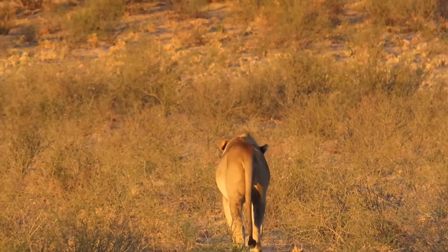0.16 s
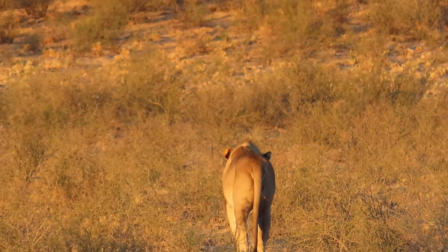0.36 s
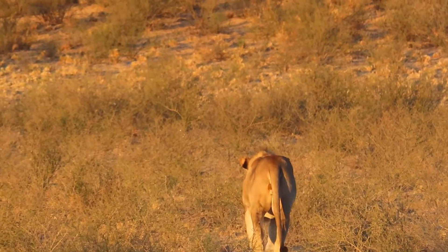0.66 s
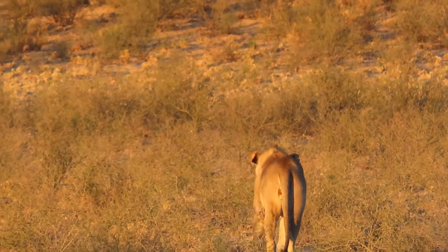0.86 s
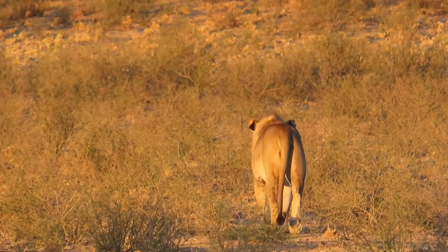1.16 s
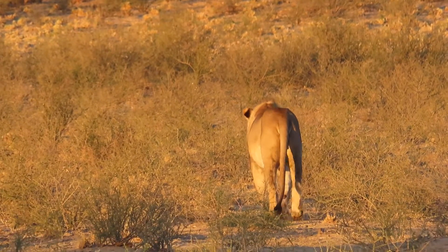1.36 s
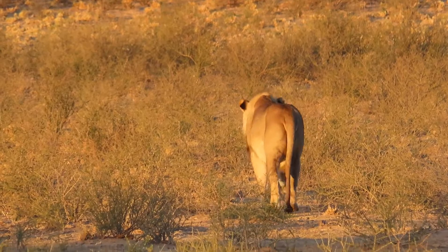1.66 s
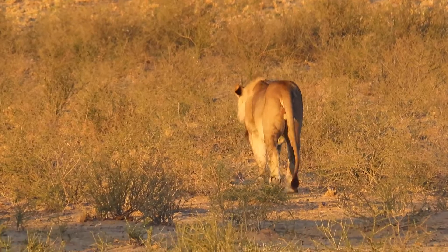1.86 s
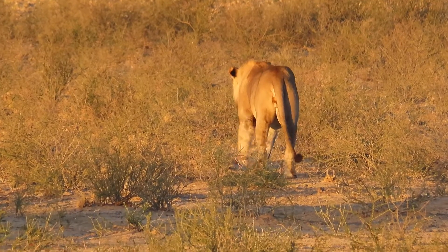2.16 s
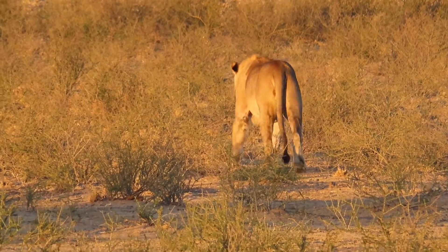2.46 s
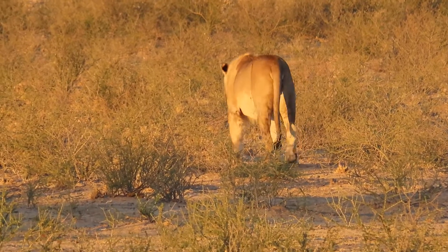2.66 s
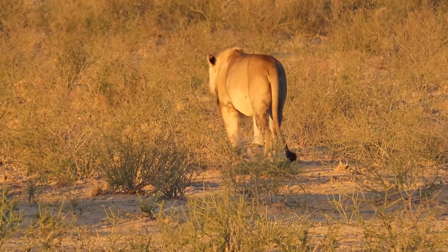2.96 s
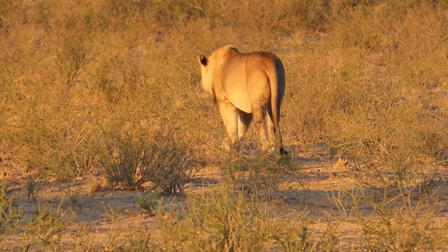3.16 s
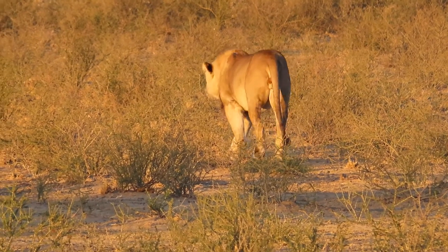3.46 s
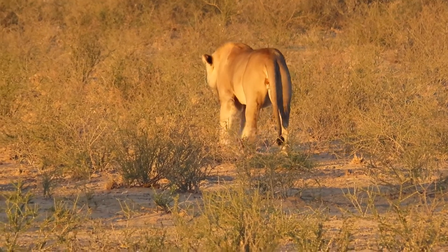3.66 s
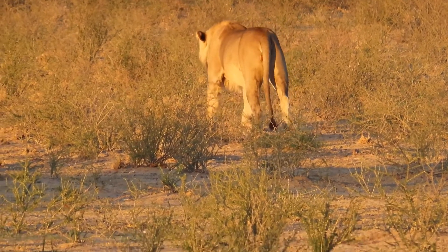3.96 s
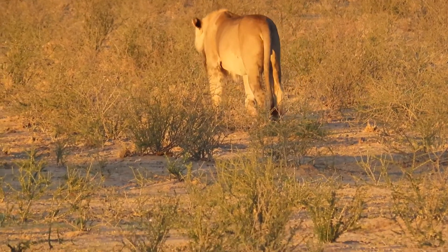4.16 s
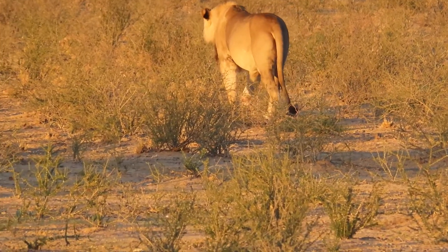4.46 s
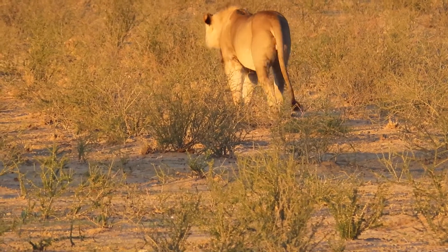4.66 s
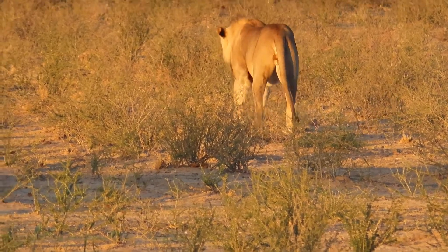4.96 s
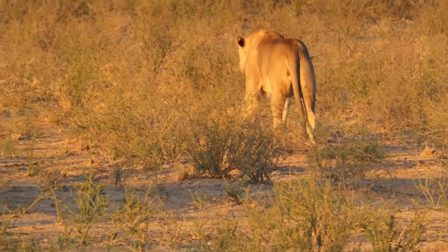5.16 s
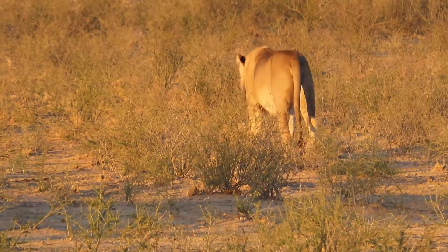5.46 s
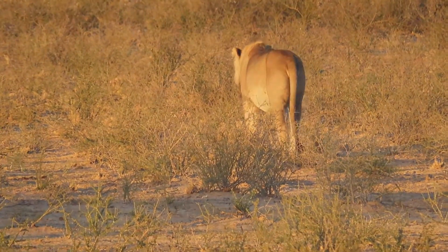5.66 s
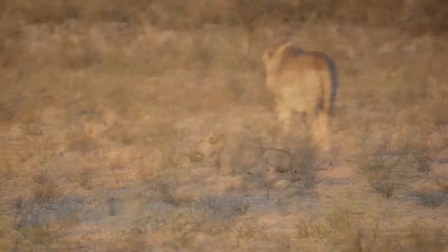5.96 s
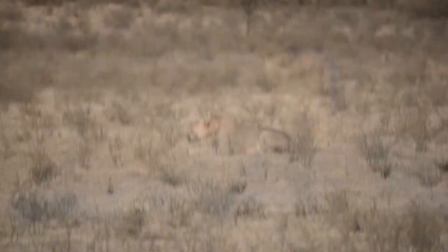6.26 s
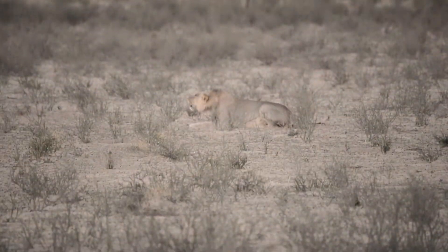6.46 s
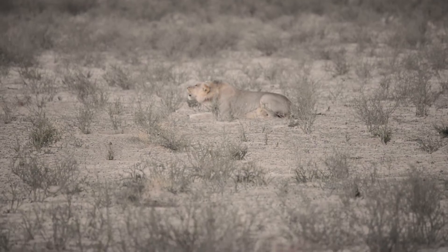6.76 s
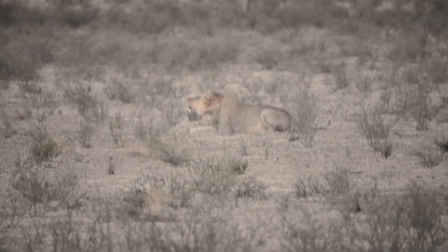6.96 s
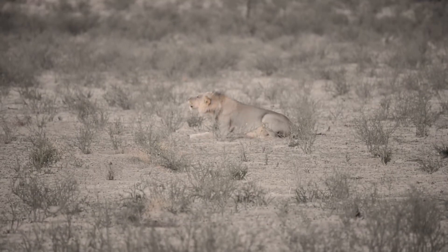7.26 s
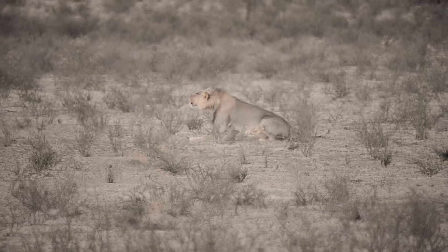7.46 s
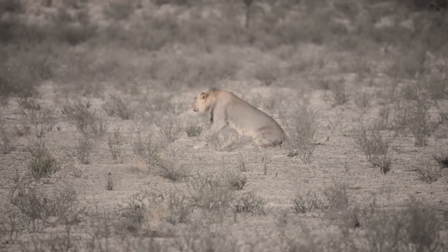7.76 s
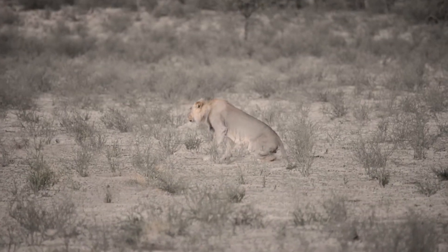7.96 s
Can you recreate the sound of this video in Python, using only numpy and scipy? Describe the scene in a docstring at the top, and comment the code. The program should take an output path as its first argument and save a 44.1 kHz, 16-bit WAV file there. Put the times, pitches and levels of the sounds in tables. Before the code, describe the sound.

Open dry scrub with very quiet, wide air and faint hiss. At 0.1 s a close, central lion starts a long, deep, nearly pure chest moan, strong and low, softening in the middle, then pushing and breaking into a pulsing raspy growl by 1 s and sagging out near 1.3. Shorter, grunting roars follow at 2.1-2.7, 3.3-3.65 (the shortest, a bit weaker), 4.4-5.0 and 5.9-6.4, each breaking into growl, with quiet gaps between. From about 6.3 the air shifts to a narrower, sandy background with a barely audible cricket tone. At 6.45 a higher lion moan arches upward; a second moan joins at 6.7, beating against it. After 7.3 both turn hoarse and growly, fading by 7.9, while dry stalks snap, scrape and rustle from 7.2 to 7.9, after one isolated crack at 6.85. A tiny falling chirp at 7.86 and a short hoarse bird squawk at 7.95-8.1 finish. Echo is very faint.

```python
"""Lions in dry scrub

A lion roars five times: a chest moan that breaks into a growl, shorter after the first, with rasp on top. Then
a resting lion moans and a second voice crosses it; both are buzzing folds through fixed resonances. Stalks
crackle in bursts of coloured noise as it gets up; a two-voiced bird squawks after a falling chirp. Scrub air
gives way to sand air with a cricket's tone; open ground returns a faint, late echo."""
import sys
import numpy as np
from scipy import signal
from scipy.fft import next_fast_len
from scipy.io import wavfile
from scipy.ndimage import uniform_filter1d

SR = 44100
rng = np.random.default_rng(int(sys.argv[2]) if len(sys.argv) > 2 else 0)


def log_audio(samples):
    """Write samples as a 16-bit WAV file to the path given in sys.argv[1]."""
    # one column per channel
    frames = np.atleast_2d(samples).T
    # limit to full scale, then quantise
    limited = np.clip(frames, -1, 1)
    pcm = np.round(limited * 32767).astype(np.int16)
    wavfile.write(sys.argv[1], SR, pcm)


N = 357651
T = np.arange(N) / SR

# vocal tract resonances of both moans: (centre [Hz], width [Hz], level [dB])
MOAN_THROAT = [(290, 125, -0.5), (446, 32, 5.5), (638, 157, -5), (686, 11, -20), (1041, 67, -11),
               (1260, 98, -14.5), (1970, 340, -28.5), (2900, 320, -27.5)]
# both moaning voices turn hoarse from this moment, over this time
HOARSE_FROM_S, HOARSE_S = 7.33, 0.24


def amp(db):
    """Decibels to gain."""
    return 10 ** (np.asarray(db) / 20)


def ramp(x):
    """Holds a value between 0 and 1."""
    return np.clip(x, 0, 1)


def bump(middle, half_length):
    """A smooth swell of height 1 around a moment."""
    return np.exp(-((T - middle) / half_length) ** 2)


def evened(x):
    """Scales to rms 1."""
    return x / np.sqrt(np.mean(x ** 2) + 1e-20)


def steadied(x, size=1500):
    """Holds the running rms near 1; size is in samples."""
    power = uniform_filter1d(uniform_filter1d(x ** 2, size), size)
    return x / np.sqrt(abs(power) + 1e-12)


def curves(rows):
    """Each column of a table as a curve over the whole time."""
    s, *columns = np.transpose(rows)
    return [np.interp(T, s, c) for c in columns]


def during(rows):
    """A soft gate, open from the first row to the last."""
    return ramp(np.minimum(T - rows[0][0], rows[-1][0] - T) / 0.0082)


def phase(hz):
    """Running phase in radians of a pitch curve."""
    return 2 * np.pi * np.cumsum(hz) / SR


def read(points, hz):
    """Gain of a spectrum at the given frequencies, read along a logarithmic axis."""
    f, db = np.transpose(points)
    return amp(np.interp(np.log(hz + 1), np.log(f), db))


def colour(x, points):
    """Causal filter with the given spectrum, falling away beyond its ends."""
    size = next_fast_len(len(x) + 8192)
    hz = abs(np.fft.fftfreq(size, 1 / SR))
    top_fall = 1 + (hz / points[-1][0] / 1.3) ** 6
    bottom_fall = np.minimum(hz / points[0][0], 1) ** 2
    gain = read(points, hz) / top_fall * bottom_fall
    # minimum phase: no sound ahead of its cause
    response = np.exp(signal.hilbert(np.log(gain + 1e-5)).conj())
    return np.fft.ifft(np.fft.fft(x, size) * response).real[:len(x)]


def noise():
    """White noise."""
    return rng.standard_normal(N)


def wander(hz):
    """Smooth chance of rms 1, up to the given rate."""
    coarse = T[::16]
    lowpass = signal.butter(2, hz, fs=1 / coarse[1], output="sos")
    slow = signal.sosfilt(lowpass, rng.standard_normal(len(coarse)))
    return np.interp(T, coarse, evened(slow))


def formants(modes, skirt=1.19):
    """The spectrum of a set of resonances with deep valleys between, as (Hz, dB) points."""
    hz = np.geomspace(modes[0][0] / 2, modes[-1][0] * 2, 300)
    gain = sum(amp(db) / (1 + ((hz - centre) / (0.49 * width)) ** 2) ** skirt
               for centre, width, db in modes)
    return np.column_stack([hz, 20 * np.log10(gain)])


def resonate(x, hz, width):
    """A resonance that follows the curve hz: shifted to zero, smoothed, shifted back."""
    turn = np.exp(1j * phase(hz))
    r = np.exp(-np.pi * width / SR)
    return 2 * (turn * signal.lfilter([1 - r], [1, -r], x / turn)).real


def ring(source, hz, db, width):
    """A steep resonance, fixed or moving: two passes, steadied, then set to a level."""
    hz = hz * np.ones(N)
    twice = resonate(resonate(source, hz, width), hz, width)
    return amp(db) * steadied(twice)


def voiced(buzz, modes):
    """The buzz through a vocal tract, at rms near 1."""
    return steadied(colour(buzz, formants(modes)))


def wavering(buzz, modes, waver_db=6.5, waver_hz=16):
    """The buzz through a vocal tract whose neighbouring resonances swell and fade apart."""
    parts = (modes[::2], modes[1::2])
    return steadied(sum(colour(buzz, formants(part)) * amp(waver_db * wander(waver_hz)) for part in parts))


def folds(pitch, rough, jitter=0.06, shimmer=0.55, flap_depth=0.46, growl_share=0.46):
    """Heavy vocal folds: returns the chest tone and the buzz that drives the throat."""
    # the chest in a growl: (frequency [Hz], level [dB])
    growl_spectrum = [(25, -18), (45, -16.5), (62, -5.5), (95, -7), (130, 9), (170, -3), (230, -17),
                      (400, -41)]
    turns = np.cumsum(pitch * (1 + jitter * rough ** 2 * wander(45))) / SR
    # when the voice breaks, loose tissue flaps slowly and lets the air out in bursts
    flap_hz = 36 * (1 + 0.32 * wander(30))
    flaps = np.cumsum(flap_hz) / SR
    bursts = 1 + 2 * flap_depth * rough ** 2 * np.exp(-(flaps % 1) / 0.1)
    flutter = amp(4.2 * rough ** 2 * wander(85)) * bursts
    puffs = noise() * (0.5 + np.exp(-(turns % 1) / 0.3))
    # each closure is a pulse; in a rough voice they differ in timing and strength
    slip = 0.16 * rough ** 2 * wander(70)
    closures = np.diff(np.floor(turns + slip), prepend=0) * (1 + rough * wander(130))
    airy = 0.7 * rough
    buzz = ((1 - airy) * evened(closures) + airy * evened(puffs)) * flutter
    # past a threshold the chest tone itself breaks up
    broken = ramp((rough - 0.46) / 0.4)
    share = ramp(growl_share * broken)
    tone = np.sqrt(2) * np.sin(2 * np.pi * turns) * (1 + shimmer * broken * wander(58))
    growl = steadied(colour(puffs * flutter, growl_spectrum))
    chest = np.sqrt(1 - share) * tone + np.sqrt(share) * growl
    return steadied(chest, size=900), buzz


def air(spectrum, side=0.93):
    """A distant wash of coloured noise that drifts a little; its bass is nearly alike in both ears."""
    mid, apart = (evened(colour(noise(), spectrum)) for _ in range(2))
    apart = colour(apart, [(100, -16.5), (400, 2.0), (1000, -5.0), (5000, -1.0), (9000, -6), (16000, -12)])
    drift_db = 1.0 * wander(4.9)
    return (mid + side * np.array([apart, -apart])) * amp(drift_db)


def cricket():
    """A cricket's high tone, quivering in strength and slightly in pitch."""
    shimmer = 1 + 0.35 * wander(60)
    return amp(-58) * shimmer * np.sin(phase(4720 + 10 * wander(100)))


def ambience():
    """Air over the scrub gives way to air over the sand, where a cricket sings."""
    # still air over the scrub: (frequency [Hz], density [dB per Hz])
    scrub_air = [(25, -20), (42, 4), (62, 5), (93, -10), (135, 5.5), (200, -9.5), (300, -10), (520, -17.5),
                 (810, -10.5), (1040, -13), (1180, -23), (2000, -29), (3500, -43)]
    # faint hiss over the scrub: (frequency [Hz], density [dB per Hz])
    scrub_hiss = [(1200, -1.5), (2500, -1), (4500, -4.5), (8500, -13), (11500, -19.5), (15000, -31)]
    # still air over the sand: (frequency [Hz], density [dB per Hz])
    sand_air = [(50, -24), (140, 19), (300, -3.5), (1000, -5), (1600, -10.5), (3600, -16.5), (4600, -12),
                (5600, -15.5), (8000, -24), (15000, -27.5)]
    # the hiss dips briefly: (middle [s], half length [s], change [dB])
    hiss_dip = (1.0, .55, -7.5)
    dip_s, dip_half, dip_db = hiss_dip
    hiss_db = -60.5 + dip_db * bump(dip_s, dip_half)
    scrub = amp(-46) * air(scrub_air) + amp(hiss_db) * air(scrub_hiss)
    sand = amp(-44) * air(sand_air, side=0.023) + cricket()
    scrub_end_s, scrub_fade_s, scrub_left_db = 6.88, 0.62, -38.5
    sand_start_s, sand_fade_s = 6.28, 0.41
    scrub_gain = np.maximum(ramp((scrub_end_s - T) / scrub_fade_s), amp(scrub_left_db))
    return scrub * scrub_gain + sand * ramp((T - sand_start_s) / sand_fade_s)


def open_ground_echo(x, t60_s=1.0, build_s=0.7, echo_db=-41):
    """Slopes and bushes scatter the low notes back, late and faint: noise taps that build, then decay."""
    t = T[:2 * SR]
    taps = rng.standard_normal(len(t)) * amp(-60 * t / t60_s) * np.minimum(t / build_s, 1)
    scattered = signal.fftconvolve(x, taps / np.linalg.norm(taps))[:N]
    return amp(echo_db) * colour(scattered, [(50, 4.5), (130, 16.5), (500, 9), (2500, -10.5)])


def chirp():
    """A short falling whistle: one sine along a pitch curve."""
    # (time [s], pitch [Hz], level [dB])
    chirp_rows = [(7.855, 3760, -50), (7.864, 3600, -54), (7.88, 3300, -53), (7.905, 3060, -60)]
    hz, level = curves(chirp_rows)
    return amp(level) * np.sin(phase(hz)) * during(chirp_rows)


def squawk():
    """The two sides of a syrinx sing at once, unsteadily, and mix into sum tones in a hoarse haze."""
    # (time [s], upper voice [Hz], lower voice [Hz], upper level [dB], lower level [dB])
    squawk_rows = [(7.95, 1130, 870, -62, -76), (7.98, 1313, 935, -47, -76), (8.005, 1415, 986, -45.5, -55),
                   (8.025, 1655, 1180, -40, -38.5), (8.05, 1676, 1243, -39, -48),
                   (8.07, 1554, 1210, -46, -39.5), (8.085, 1460, 1120, -45, -43),
                   (8.11, 1290, 1030, -41, -55)]
    upper_hz, lower_hz, upper_db, lower_db = curves(squawk_rows)
    upper, lower = (phase(hz * (1 + 0.014 * wander(300))) for hz in (upper_hz, lower_hz))
    both_db = (upper_db + lower_db) / 2
    own = sum(amp(db) * (0.44 * np.sin(p) + np.sin(2 * p) + 0.33 * np.sin(3 * p))
              for p, db in ((upper, upper_db), (lower, lower_db)))
    sum_tones = np.sin(upper + lower) + 0.3 * np.sin(upper + 2 * lower)
    mixed = amp(both_db + 3 * wander(60)) * sum_tones
    haze = ring(noise(), upper_hz + lower_hz, both_db - 10, width=1100)
    return (own + mixed + haze) * (T > squawk_rows[0][0])


def snap(s, db, spectrum, decay, rise=0.0019):
    """A stalk snaps: one sharp burst of coloured noise with a weak tail."""
    t = np.arange(-1024, 2048) / SR
    # the burst peaks 2 ms after the given time
    burst_shape = np.exp(np.minimum((t - 0.002) / rise, (0.002 - t) / decay))
    tail = 0.12 * np.exp(-abs(t) / 0.007) * (t > 0)
    burst = colour(rng.standard_normal(len(t)) * (burst_shape + tail), spectrum)
    burst /= np.sqrt(uniform_filter1d(burst ** 2, 128).max())
    return amp(db) * np.pad(burst, (round((s + t[0]) * SR), N))[:N]


def dry_grass():
    """Stalks scrape past each other and snap, over a fine crackle of many small ones."""
    # stalks snapping: (time [s], base level [dB], woody knock against the base [dB])
    snap_rows = [(6.8449, -27, -19), (7.215, -44, 4), (7.308, -41, 2.5), (7.3166, -34.5, -3),
                 (7.3615, -26.5, -1), (7.391, -33, -2), (7.402, -34.5, 4), (7.438, -36, -3),
                 (7.591, -31.5, 7), (7.635, -34.5, 3), (7.7202, -27.5, 0.5), (7.7581, -30.5, -4),
                 (7.768, -44, 6), (7.8023, -22, 0.5), (7.903, -46, -16)]
    # spectrum of the sharp crack: (frequency [Hz], level [dB])
    crack_spectrum = [(1200, -33), (2400, -8), (3100, -10.5), (3900, 8), (4700, -1.5), (5500, 1),
                      (7000, -17), (9000, -27.5), (15000, -59)]
    # spectrum of the woody knock: (frequency [Hz], level [dB])
    knock_spectrum = [(300, -15), (700, -3), (950, -0.5), (1250, 7.5), (1700, -12), (2400, -8), (4000, -51)]
    # faint, bright ticks: (time [s], level [dB])
    tick_rows = [(0.322, -55), (.402, -51.5)]
    # grass crushed under the body: (time [s], level [dB])
    rustle_rows = [(7.3, -67), (7.345, -39), (7.38, -50), (7.42, -42), (7.46, -37), (7.552, -37),
                   (7.62, -43), (7.66, -31.5), (7.715, -35.5), (7.745, -50.5), (7.8, -34.5), (7.84, -59)]
    # spectrum of the crushed grass: (frequency [Hz], level [dB])
    grass_spectrum = [(400, -16), (750, 12.5), (1250, -0.5), (1700, -7.5), (2500, -0.5), (3100, -7),
                      (3900, 4), (4700, -8.5), (5500, -5.5), (7000, -20.5), (9000, -33), (15000, -67.5)]
    # stalks scraping past each other: (middle [s], half length [s], level [dB])
    swish_rows = [(7.352, 0.0089, -33.5), (7.438, 0.0068, -32.5), (7.673, 0.012, -37), (7.72, 0.012, -43),
                  (7.8, 0.0086, -37)]
    # spectrum of the scraping: (frequency [Hz], level [dB])
    scrape_spectrum = [(1500, -3), (3000, -6.5), (3900, 4), (4700, 0.5), (5700, -1), (7000, -20),
                       (10000, -27.5), (15000, -38)]
    # the crack sits 2 dB above the base level
    cracks = sum(snap(s, db + 2, crack_spectrum, 0.002, rise=0.0006) for s, db, _ in snap_rows)
    knocks = sum(snap(s, db + knock, knock_spectrum, 0.0033, rise=0.0006) for s, db, knock in snap_rows)
    tick_spectrum = [(3500, 1.5), (5500, -8), (8000, 1.0), (13000, -19)]
    ticks = sum(snap(s, db, tick_spectrum, 0.003) for s, db in tick_rows)
    # single-sample grains of random sign and size, 3500 a second in the rustle, 5000 in the scrapes
    sizes_db = 3.5 * np.minimum(rng.exponential(1, N), 3.5) - 0.2 * wander(45)
    sizes = np.sign(noise()) * amp(sizes_db)
    grains = sizes * (rng.random(N) < 3500 / SR)
    rustle = evened(colour(grains, grass_spectrum)) * amp(curves(rustle_rows)[0]) * during(rustle_rows)
    scrapes = evened(colour(sizes * (rng.random(N) < 5000 / SR), scrape_spectrum))
    swishes = scrapes * sum(amp(db) * bump(s, half) for s, half, db in swish_rows)
    return cracks + knocks + ticks + rustle + swishes


def companion():
    """A second moan that crosses the first in pitch, beats with it and turns hoarse too."""
    # (time [s], pitch [Hz], chest tone [dB])
    answer_rows = [(6.66, 126.9, -43), (6.738, 142.7, -25.5), (6.852, 154.5, -21.5), (6.942, 200.1, -17.5),
                   (7.07, 201.6, -19), (7.29, 210.7, -37.5), (7.43, 200.2, -26.5), (7.62, 214, -26.5),
                   (7.8, 161.4, -32.5)]
    pitch, level = curves(answer_rows)
    rough_start, rough_end = 0.48, 0.7
    rough = ramp(rough_start + (rough_end - rough_start) * ramp((T - HOARSE_FROM_S) / HOARSE_S))
    chest, buzz = folds(pitch, rough, jitter=0.15, growl_share=0.043)
    throat = amp(-17) * voiced(buzz, MOAN_THROAT)
    return amp(level) * (chest + throat) * during(answer_rows)


def resting_lion():
    """A higher, arching moan: its throat swells slowly and its folds grow hoarse until it growls."""
    # (time [s], pitch [Hz], chest tone [dB])
    moan_rows = [(6.44, 130.1, -27.5), (6.65, 213.6, -22), (6.792, 215.9, -21), (6.949, 170.5, -29.5),
                 (7.1, 161.1, -17.5), (7.166, 150.2, -11.5), (7.331, 152.1, -12), (7.44, 141.9, -21.5),
                 (7.49, 150.5, -14.5), (7.539, 152.2, -30), (7.609, 171.1, -20.5), (7.711, 173.9, -21),
                 (7.77, 138, -27), (7.835, 119.7, -21), (7.924, 116.7, -44)]
    # resonances that ring out briefly: (middle [s], half length [s], centre [Hz], level against throat [dB])
    moan_rings = [(6.903, 0.041, 465, 1), (6.96, 0.14, 670, 8), (7.0, 0.092, 349, 2), (7.02, .1, 1285, -9),
                  (7.018, 0.066, 1650, -16), (7.027, .08, 2320, -15.5), (7.197, 0.086, 1041, 0),
                  (7.258, .06, 426, -6), (7.311, 0.086, 758, -2), (7.65, 0.076, 940, 1)]
    # strained and rough while it is high: (middle [s], half length [s], added roughness [0-1])
    strain_row = (6.92, 0.18, 0.24)
    strain_s, strain_half, strain = strain_row
    pitch, chest_db = curves(moan_rows)
    t, left = T - moan_rows[0][0], moan_rows[-1][0] - T
    hoarse = ramp((T - HOARSE_FROM_S) / HOARSE_S)
    rough_start, rough_hoarse = 0.24, 0.76
    rough = rough_start + (rough_hoarse - rough_start) * hoarse + strain * bump(strain_s, strain_half)
    chest, buzz = folds(pitch, ramp(rough), jitter=0.08, flap_depth=0.78, growl_share=0.26)
    rings = sum(bump(s, half) * ring(buzz, hz, db, width=40) for s, half, hz, db in moan_rings)
    # the throat starts at -44.5 dB and gains 11 dB a second, less once hoarse
    throat_db = -44.5 + 11 * t - 5.5 * hoarse
    throat = steadied(wavering(buzz, MOAN_THROAT) + rings) * amp(throat_db)
    throat = throat + hoarse * ring(buzz, 345, -35, width=117)
    attack_s, release_s = 0.18, 0.15
    throat = throat * ramp(t / attack_s) * ramp(left / release_s) ** 2
    return amp(chest_db) * chest * during(moan_rows) + throat


def roar_pharynx(buzz):
    """The buzz through the moving resonance of the pharynx, at once tuned and levelled by its curve."""
    # one curve a roar: (time [s], centre [Hz], level before a 1 dB cut [dB])
    pharynx_rows = [
        [(0.14, 455, -49), (0.206, 476, -29.5), (0.416, 459, -36.5), (0.56, 405, -50.5), (0.818, 407, -28),
         (0.926, 449, -45), (1.04, 450, -30), (1.262, 411, -49.5), (1.27, 418, -43.5)],
        [(2.07, 446, -65), (2.102, 442, -40.5), (2.134, 448, -31), (2.222, 460, -39), (2.276, 431, -22),
         (2.388, 524, -30.5), (2.414, 468, -27), (2.598, 453, -40.5), (2.68, 423, -55.5)],
        [(3.27, 407, -65), (3.324, 394, -48), (3.362, 402, -49), (3.388, 448, -41.5), (3.418, 424, -32),
         (3.492, 434, -34.5), (3.556, 422, -46), (3.59, 427, -41.5), (3.65, 416, -46.5)],
        [(4.41, 444, -58), (4.428, 425, -49.5), (4.484, 440, -27.5), (4.598, 450, -33.5), (4.66, 468, -26),
         (4.77, 428, -37), (4.796, 453, -28.5), (4.976, 400, -66.5), (5.0, 406.5, -57)],
        [(5.9, 449, -51), (5.942, 418, -43.5), (5.976, 429, -34), (6.13, 491.7, -32), (6.16, 448, -42),
         (6.228, 446, -33), (6.308, 416, -47.5), (6.366, 412, -42.5), (6.45, 420, -59)],
    ]
    hz, db = curves([row for roar in pharynx_rows for row in roar])
    return ring(buzz, hz, db - 1, width=56)


def roar_throat(buzz, rough, calm, early, sunk, mouth_hz, mouth_db):
    """Smooth and growling tract shapes mixed by roughness, with low, mouth and bright resonances."""
    # tract in a smooth roar: (centre [Hz], width [Hz], level [dB])
    smooth_throat = [(217, 280, 3), (337, 240, -8.5), (526, 64, -11.5), (670, 15, -10), (970, 130, -11.5)]
    # tract in a growl: (centre [Hz], width [Hz], level [dB])
    growl_throat = [(213, 130, -1.5), (316, 65, 3.5), (564, 140, -14.5), (930, 150, -22.5)]
    # upper resonances that come out as the larynx sinks: (centre [Hz], level [dB])
    bright_rings = [(1320, -24.5), (1900, -30)]
    smooth = wavering(buzz, smooth_throat, waver_db=2.5)
    throat = steadied((1 - rough) * smooth + rough * voiced(buzz, growl_throat))
    # the calm tone lifts the mouth resonance; the sunk larynx weakens it and brings out the low one
    mouth = ring(buzz, mouth_hz * (1 + 0.069 * calm), mouth_db - 4 * sunk, width=190)
    # the low resonance fills out towards the break
    low = ring(buzz, 243.5, -7 + 7 * sunk, width=48) * np.maximum(1 - early, sunk)
    bright = sum(ring(buzz, hz, db, width=220) for hz, db in bright_rings) * sunk
    return throat + low + mouth + bright


def roar_rasp(rush, broken, pulses, ring_hz):
    """Upper resonances excited by buzz and breath; in a growl they pulse and narrow ones flicker."""
    # broad rasp resonances: (centre [Hz], width [Hz], level [dB])
    rasp_modes = [(1490, 190, 4.5), (1720, 380, 5.5), (2180, 860, -3), (2830, 1100, -13), (3820, 160, -12),
                  (4230, 350, -12.5), (6000, 1100, -33)]
    # narrow resonances in every growl: (centre [Hz], level [dB])
    rasp_rings = [(2820, -13), (4270, -17)]
    flicker_hz, flicker_db = 28, 5.5
    rings = sum(ring(rush, hz, db + flicker_db * wander(flicker_hz), width=140)
                for hz, db in [(ring_hz, -6.5), *rasp_rings])
    return (voiced(rush, rasp_modes) + broken * rings) * amp(2 * broken * pulses)


def roaring_lion():
    """Each roar swells on a rising, nearly pure chest tone, pushes, breaks into a raspy growl and sags."""
    # one row a roar: (start [s], attack [s], hold until the voice breaks [s], growl [s],
    # first pitch [Hz], top pitch [Hz], chest [dB], throat [dB], throat before the push [dB], rasp [dB],
    # roughness before the break [0-1], depth of the growl [0-1], last push [dB],
    # mouth [Hz], mouth [dB], mouth swell [dB/s], rasp ring [Hz], rasp length [s])
    roar_rows = [ (0.125, 0.092, 0.86, 0.31, 103.4, 131.3, -9, -33, -1.5, -56.5, 0.25, 0.06, 4, 1195, -14, -6.5, 1673, 0.2),
                 (2.067, 0.099, 0.26, 0.37, 95.05, 133.8, -8.5, -28, -5, -58.5, 0.44, 0.27, 0.5, 947, -14.5, 1, 2650, 0.22),
                 (3.262, 0.061, 0.17, 0.22, 89.56, 130.4, -14, -30, -5.5, -58.5, 0.63, 0.5, -2.5, 900, -20.5, 14.5, 3590, 0.091),
                 (4.411, 0.083, .3, .29, 89.04, 128.4, -11, -31.5, 0, -55.5, 0.5, 0.5, -1.5, 976, -19.5, 7.5, 1780, 0.093),
                 (5.889, 0.087, 0.23, 0.35, 95.57, 118.3, -12, -31.5, -2, -56, 0.33, 0.44, 1, 942, -13, 4.5, 1746, 0.21)]
    # hard gusts of air that burst through the growl: (time [s], level [dB])
    gust_rows = [(1.073, 3), (1.118, 3.5), (2.368, 0), (2.414, 4), (3.423, 3.5), (3.469, 3.5), (3.496, 2.5),
                 (4.636, 2), (4.741, 4), (4.904, 5), (6.186, 1.5)]
    # swells as mouth and throat change shape: (middle [s], half length [s], centre [Hz], level [dB])
    roar_rings = [(.27, 0.048, 1220, -44), (0.38, 0.096, 640, -43.5), (0.76, 0.1, 935, -56.5),
                  (.9, .06, 1840, -58.5), (2.23, 0.075, 255, -28.5), (4.73, .06, 283, -31.5),
                  (3.448, 0.049, 3000, -60.5), (4.718, .09, 1730, -55), (4.7, 0.11, 2500, -59.5),
                  (0.91, 0.065, 1320, -50)]
    rows = np.array(roar_rows)
    current = np.maximum(np.searchsorted(rows[:, 0], T) - 1, 0)
    (start, attack, hold, growl, first_hz, top_hz, chest_db, throat_db, early_db, rasp_db,
     first_rough, depth, push_db, mouth_hz, mouth_db, mouth_slope, rasp_hz, rasp_s) = rows[current].T

    # the phases of a roar, each between 0 and 1
    t = np.maximum(T - start, 0)
    after_break = t - hold
    left = hold + growl - t
    # a roar held long settles into a softer, clean tone, and stirs again before it breaks
    settle_after_s, settle_s, stir_s = 0.32, 0.14, 0.29
    calm = ramp((t - settle_after_s) / settle_s) * ramp(-after_break / stir_s)
    # throat and rasp are held back a little until just before the break
    early = ramp(-after_break / 0.15)
    # the chest level shifts in a last push, which takes longer in a long roar
    push = np.exp(-((-after_break - 0.014) / (0.031 * np.sqrt(hold))) ** 2)
    break_s = 0.1
    broken = ramp(after_break / break_s + 0.5)
    spent = ramp(after_break / growl)
    # in a long hold the larynx sinks
    sink_after_s, sink_s = 0.71, 0.13
    sunk = ramp((t - sink_after_s) / sink_s) * (1 - ramp(after_break / break_s))

    # pitch climbs as the pressure builds, sits higher when calm and sags as the air runs out
    climb_s, sag_s, sag_share = 0.1, 0.22, 0.39
    climb_hz = top_hz + (first_hz - top_hz) * np.exp(-t / climb_s)
    pitch = climb_hz * (1 - sag_share * ramp(1 - left / sag_s)) * (1 + 0.027 * calm)
    rough_growl, rough_calm = 0.78, 0.081
    rough = first_rough + (rough_growl - first_rough) * broken + (rough_calm - first_rough) * np.sqrt(calm)
    rough = ramp(rough)
    chest, buzz = folds(pitch, rough, shimmer=0.81 * np.sqrt(ramp(depth)), growl_share=depth)
    # a second oscillator joins the folds unless the tone is calm
    second = np.sin(phase(49 * (1 + 0.15 * rough * wander(25))))
    buzz = buzz * (1 + 0.55 * (1 - calm) * (1 - broken / 2) * second)

    pharynx = roar_pharynx(buzz)
    throat = roar_throat(buzz, rough, calm, early, sunk, mouth_hz, mouth_db + mouth_slope * t)
    pulses = np.sin(phase(26.82 * (1 + 0.359 * wander(20))))
    rush = steadied(buzz, size=200) + (1 - calm) * noise()
    rasp = roar_rasp(rush, broken, pulses, rasp_hz)

    # the pulses shake the voice, and as the air runs out it falls apart into them
    spent_pulse_db = 3.5 * spent
    shake_db = (1 * broken + spent_pulse_db) * pulses - spent_pulse_db / 2
    chest_db = chest_db + push_db * push - 1.5 * calm - 3 * broken - 16 * spent + shake_db
    # the overtones waver in strength
    waver_db = 2.5 * wander(8.9)
    throat_db = throat_db - 6.5 * calm + early_db * early - 20.5 * spent ** 2 + waver_db + shake_db / 2
    rasp_fade = ramp((after_break - rasp_s) / 0.053)
    rasp_db = rasp_db - 7 * calm - 0.5 * early - 13 * rasp_fade
    # the throat swells sooner than the chest
    chest_swell, throat_swell = (1 - np.exp(-(t / s) ** 2) for s in (attack, 0.67 * attack))
    gust_db = sum(db * bump(s, 0.0069) for s, db in gust_rows)
    swells = sum(bump(s, half) * ring(rush, hz, db, width=71) for s, half, hz, db in roar_rings)
    tract = chest_swell * rasp * amp(rasp_db) + throat_swell * throat * amp(throat_db)
    tract = tract + ramp(t / 0.039) * pharynx + swells
    chest = chest_swell * chest * amp(chest_db + 0.94 * gust_db)
    # the folds close
    return (chest + tract * amp(gust_db)) * ramp(left / 0.045)


def scene():
    """All the animals are straight ahead in wide air; the resting pair has no deep bass."""
    thin = signal.butter(3, 105, "high", fs=SR, output="sos")
    pair = signal.sosfilt(thin, resting_lion() + companion())
    lions = roaring_lion() + pair
    direct = lions + dry_grass() + squawk() + chirp()
    return direct + open_ground_echo(lions) + ambience()


def record(dry, low_cut_hz=44, band_limit_hz=15800):
    """The microphone's low cut, then the band limit."""
    dry = signal.sosfilt(signal.butter(3, low_cut_hz, "high", fs=SR, output="sos"), dry)
    lowpass = signal.firwin(511, band_limit_hz, window=("kaiser", 9), fs=SR)
    return signal.oaconvolve(dry, lowpass[None], "same")


dry = scene()
out = record(dry)
log_audio(out)
```